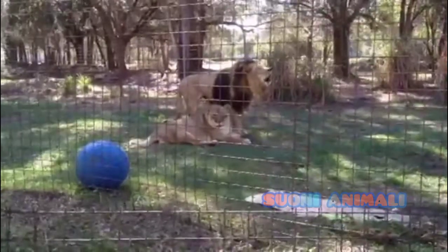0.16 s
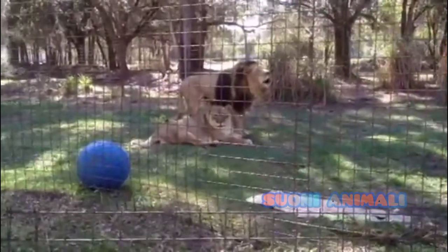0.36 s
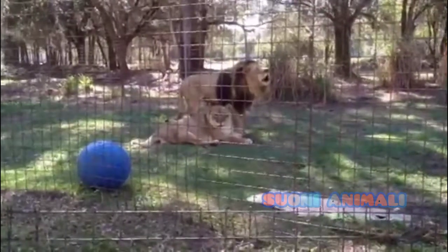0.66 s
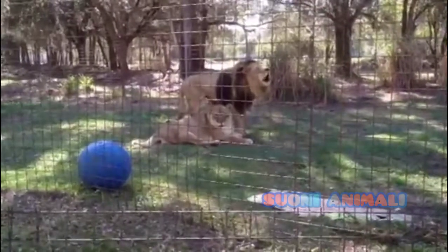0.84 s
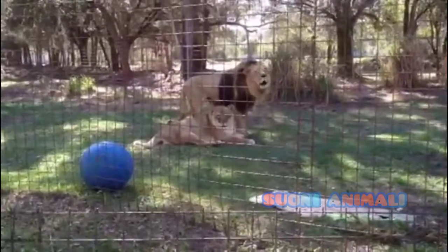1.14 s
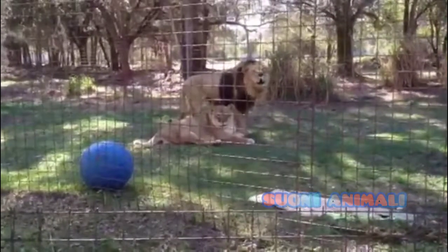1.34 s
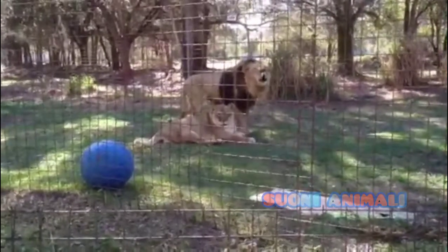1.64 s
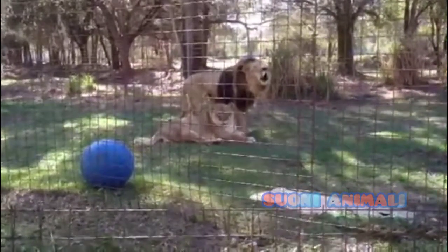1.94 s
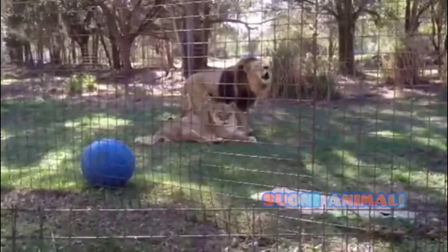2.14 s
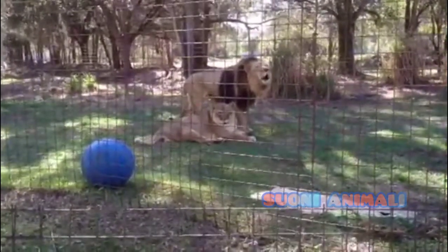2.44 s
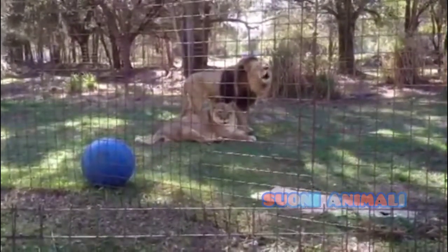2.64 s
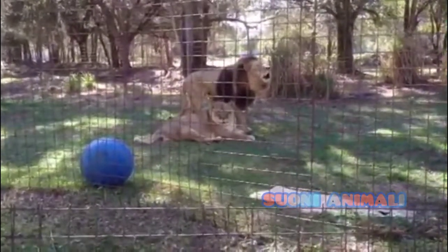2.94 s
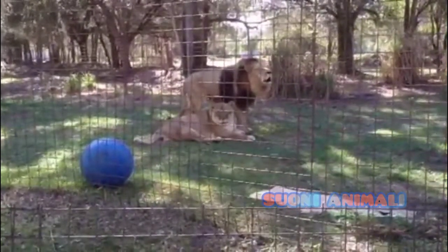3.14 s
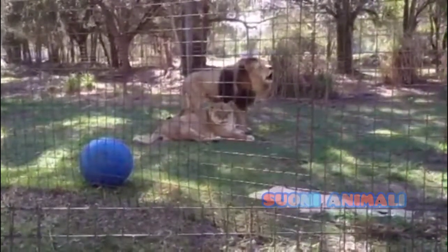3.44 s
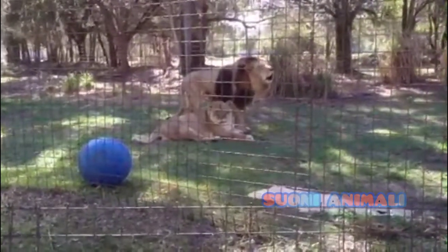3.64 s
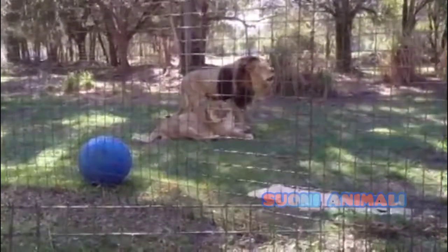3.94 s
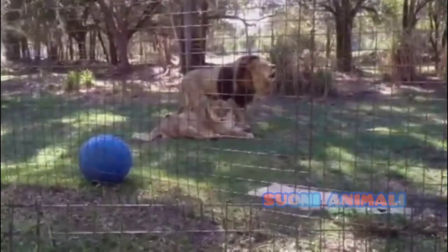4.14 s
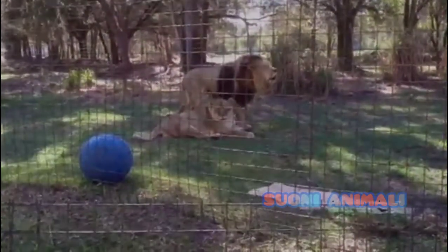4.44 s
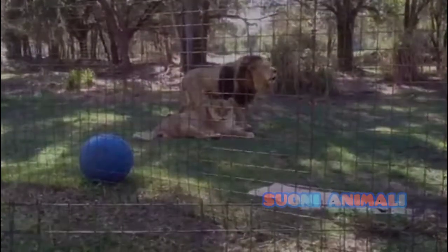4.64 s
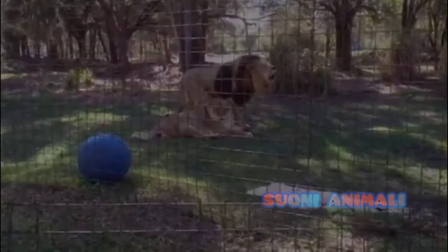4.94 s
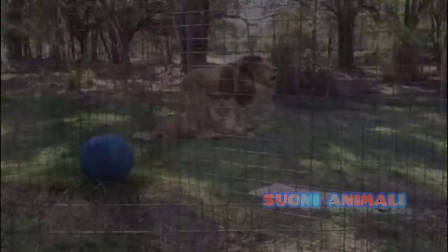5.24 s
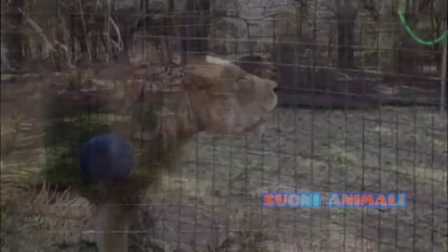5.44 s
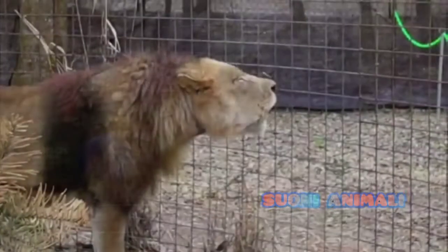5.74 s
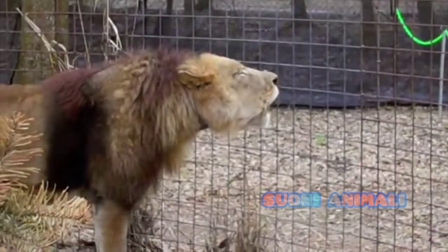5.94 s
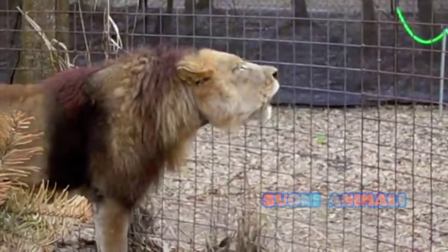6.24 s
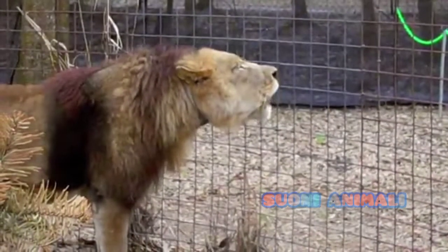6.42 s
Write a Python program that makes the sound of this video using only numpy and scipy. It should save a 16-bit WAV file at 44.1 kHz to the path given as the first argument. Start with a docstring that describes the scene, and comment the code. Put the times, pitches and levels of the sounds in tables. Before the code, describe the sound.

Mono outdoor sound: a male lion at moderate distance pumps out heavy, breathy grunting roars with rough growling tails, over quiet woodland air and faint stirrings. An abrupt cut leaves a short gap. Then wider, close-miked sound fades in: another lion's nasal moan grows into a loud raspy roar with hissing breath and wall reflections, still going at the end.

```python
"""A run of short roars comes first, each surging to a deep boom and sagging into a rattling growl: a lion
in a wooded enclosure. The sound cuts off, and a second lion, close by in a walled yard, swells from a moan
into one long, harsh roar. Each voice is a train of vocal-fold pulses and puffed noise filtered by throat
resonances, joined by sine overtones and hiss; decaying noise tails give the echoes of each place."""
import sys
import numpy as np
from scipy import signal
from scipy.fft import rfft, irfft, next_fast_len
from scipy.io import wavfile
from scipy.ndimage import uniform_filter1d, map_coordinates

SR = 44100
rng = np.random.default_rng(int(sys.argv[2]) if len(sys.argv) > 2 else 0)


def digitize_waveform(pressure):
    """Quantize a signal to 16-bit integers and store it at the path in sys.argv[1].

    Rows of a 2-D input are taken as channels; values are limited to [-1, 1].
    """
    field = np.atleast_2d(pressure).T
    bounded = np.clip(field, -1, 1)
    quanta = np.round(bounded * 32767).astype(np.int16)
    wavfile.write(sys.argv[1], SR, quanta)


N = 290173

# In filter tables only the shape matters: the filtered sound is brought to rms 1.
# Background spectrum of the wood and of the yard: (frequency [Hz], density [dB per Hz])
WOOD_SPECTRUM = [(24, -92), (40, -65.5), (105, -20), (122, -18), (145, -5.5), (191, -13.5), (338, -18),
                 (364, -16), (412, -22), (693, -14), (1000, -16.5), (1730, -31), (4560, -33.5),
                 (5290, -33.5), (15000, -47)]
YARD_SPECTRUM = [(24, -41), (40, -8), (565, -3.5), (1470, -8), (2120, -10), (4530, -25), (7050, -19.5),
                 (14000, -42)]
WOOD_DB = -49
# Echo among the trees and between the walls: (frequency [Hz], time to decay by 60 dB [s])
TREE_DECAY = [(150, 0.52), (800, 0.67), (3000, 0.2), (12000, 0.13)]
WALL_DECAY = [(150, 0.93), (1000, 0.36), (8000, 0.3)]
# Faint rustles between the roars: (time [s], Gaussian spread [s], level [dB])
RUSTLES = [(0.752, 0.033, -54), (1.54, 0.0096, -51), (1.602, .025, -52), (3.422, 0.0051, -49.5),
           (3.461, 0.026, -51), (3.947, 0.0031, -53)]
# Spectrum of the rustles: (frequency [Hz], level [dB])
RUSTLE_SPECTRUM = [(200, -16.5), (700, 4), (1150, 3.5), (1800, -5), (4000, -16.5), (9000, -17.5),
                   (15000, -39)]

# Short roars: (time of the boom [s], boom level [dB], relative rasp level [dB], top pitch [Hz],
# stretch of the rise [factor], growl length [s], relative growl chest level [dB],
# relative growl rasp level [dB], fade of that rasp [dB])
ROARS = [(0.11, -7.5, -20, 156.1, 1.005, .19, -25, -29, 10.5),
         (.917, -8, -19.5, 157, 0.98, 0.12, -24, -29, 9.5),
         (1.834, -8.5, -20.5, 153.7, 1.233, .5, -20.5, -29.5, 6.5),
         (2.904, -9, -21.5, 148, .95, 0.059, -26, -31.5, 5.5),
         (3.602, -8, -19.5, 152.4, 1, .09, -23, -30, 7.5),
         (4.305, -8, -20.5, 151, 1.01, 0.084, -24, -33.5, 5.5),
         (4.984, -9.5, -21.5, 151.5, 1.004, 0.095, -24.5, -30, 1.5)]
# Catches in the throat, where the growl rattles harder: (time [s], Gaussian spread [s], lift [dB])
CATCHES = [(0.298, 0.0057, 5), (1.095, .012, 3.5), (1.9, 0.012, 3.5), (2.02, 0.004, 4.5), (2.078, 0.011, 6),
           (2.157, 0.013, 7.5), (2.232, 0.0029, 3), (2.281, 0.015, 8.5), (2.387, 0.0064, 12),
           (2.988, 0.012, 6), (3.674, 0.0098, 5), (4.4, 0.0081, 1.5)]
# First lion's throat in the surge, slope: (frequency [Hz], level [dB])
SURGE_SLOPE = [(110, -54), (260, -1.5), (410, -0.5), (600, -4.5), (950, -11), (1600, -11.5), (2050, -18),
               (2600, -17.5), (4200, -40), (6000, -53)]
# and its resonances: (centre [Hz], width [Hz], lift [dB])
SURGE_FORMANTS = [(457, 66, 13.2), (660, 88, 4.8), (1088, 62, 8.4), (1735, 140, 7.8), (3700, 250, 16)]
# First lion's throat in the growl, slope: (frequency [Hz], level [dB])
GROWL_SLOPE = [(90, -64), (180, 11.5), (260, -9.5), (330, -3.5), (480, -7.5), (900, -8.5), (1600, -22.5),
               (2050, -21), (2700, -25), (4200, -37.5), (6000, -42)]
# and its resonances: (centre [Hz], width [Hz], lift [dB])
GROWL_FORMANTS = [(475, 89, 13), (736, 33.5, 19), (914, 32, -12), (1136, 130, 15), (1623, 220, 14.5),
                  (2420, 180, 13), (2855, 51, 16)]
# Clear overtones of the surge: (multiple of the pitch [integer], relative level [dB])
SURGE_ORDERS = [(3, -3.5), (5, -10.5), (8, -15.5)]
# First lion's air past the teeth: (frequency [Hz], level [dB])
TEETH_SPECTRUM = [(1500, -33), (3000, 0.5), (4500, 0.5), (5300, -10.5), (6200, -0.5), (8000, 2.5),
                  (10500, -12.5), (13500, -2), (15500, -11)]
# Low turbulent rumble of the first lion: (frequency [Hz], level [dB])
RUMBLE_SPECTRUM = [(20, -9.5), (90, 4.0), (200, -1.5), (500, -69.0)]

# Long roar: (time [s], pitch [Hz], roughness [0-1, clipped], mouth opening [0-1])
LONG_ROAR = [(5.4, 137.8, 0.49, 0.09), (5.58, 142.8, 0.67, 0), (5.68, 135.6, 0, 0.32),
             (5.77, 131.8, 0.14, 0.96), (5.89, 128.6, 0.57, 0.94), (6.0, 134.1, 0.99, 1),
             (6.55, 129.9, 1.03, 0.98)]
# Its effort: (time [s], relative throat level [dB], chest level [dB])
EFFORT = [(5.28, -61, -68), (5.33, -43.5, -48.5), (5.43, -27.5, -50.5), (5.72, -22.5, -38.5),
          (5.88, -18.5, -34.5), (6.03, -18, -23.5), (6.25, -19, -23.5), (6.55, -22.5, -24.5)]
# Its throat resonances rise, sink back and rise again: (time [s], frequency scale [factor])
LONG_SCALE = [(5.55, 1), (5.75, 1.03), (6.0, 1.005), (6.58, 1.02)]
# Clear overtones of the long roar: (multiple of the pitch [integer],
# relative level with mouth shut [dB], relative level with mouth open [dB])
LONG_ORDERS = [(2, -6.5, -10), (3, -8, -18.5), (4, -3, -17.5), (5, -21, -21), (6, -7.5, 0), (7, -21, -9.5),
               (8, -19.5, -15.5), (10, -21, -19.5), (11, -14, -17.5), (14, -33, -23), (18, -20.5, -15),
               (19, -26, -18)]
# Overtones of its second vibration: (multiple of that pitch [integer], relative level [dB])
SECOND_ORDERS = [(3, -10), (4, -0.5), (5, -18.5)]
# Second lion's throat with the mouth nearly shut, slope: (frequency [Hz], level [dB])
SHUT_SLOPE = [(110, -58), (260, -1.5), (420, 0), (900, -11), (1200, -28), (2000, -23), (2700, -25),
              (3400, -45), (6000, -61.5)]
# and its resonances: (centre [Hz], width [Hz], lift [dB])
SHUT_FORMANTS = [(530, 85, 13.8), (842, 74, 21), (1443, 150, 24), (1837, 72, 15), (2500, 550, 12.4)]
# Second lion's throat with the mouth wide open, slope: (frequency [Hz], level [dB])
OPEN_SLOPE = [(110, -48), (180, 1), (280, -22.5), (480, -0.5), (640, -12), (850, -2.5), (1200, -14.5),
              (1650, -12.5), (2100, -28), (3200, -22), (4500, -30), (6500, -54)]
# and its resonances: (centre [Hz], width [Hz], lift [dB])
OPEN_FORMANTS = [(415, 90, 8.3), (534.3, 18, 10.8), (718.3, 38.5, 22.4), (836, 65, 11.3),
                 (1011.6, 19, 15.4), (1525, 120, 8.5), (2170, 120, 3.8), (2927, 134, 13.8)]
# Second lion's hiss, slope: (frequency [Hz], level [dB])
FANG_SLOPE = [(2500, -5), (4500, -13), (5500, -6), (6400, -2.5), (7600, -3.5), (9000, -15), (11000, -26),
              (14000, -29.5), (15000, -50)]
# and its resonances: (centre [Hz], width [Hz], lift [dB])
FANG_WHISTLES = [(4640, 145, 12.5), (5330, 120, 6.5), (6300, 230, 9), (7080, 160, 7), (7700, 200, 2.5)]
# Moans and squeals that slide through the long roar: (time [s], length [s], first pitch [Hz],
# last pitch [Hz], level [dB])
GLIDES = [(5.311, 0.15, 182.5, 239, -43), (5.414, 0.078, 562, 549, -31), (5.516, 0.073, 235, 206, -23.5),
          (5.572, 0.144, 885, 802, -31.5), (5.702, 0.067, 1869, 1840, -35), (5.82, 0.2, 1047, 1027, -32.5),
          (5.932, 0.037, 2520, 2440, -37), (5.973, 0.59, 220, 193.2, -30.5)]

CUT_S = 5.0
TOP_HZ = 15500
SURGE_ROUGH, GROWL_ROUGH = 0.88, 0.85  # share of noise power among the pulses
# surge of each short roar: attacks and releases are the times taken by 20 dB
BOOM_HOLD_S, BOOM_ATTACK_S, BOOM_RELEASE_S = 0.01423, 0.06, 0.02656
RASP_LEAD_S, RASP_ATTACK_S, RASP_RELEASE_S = 0.034, 0.042, 0.048
# pitch leaps from rest to its top, drops back and sags through the growl
REST_HZ, GROWL_HZ, SLACK_HZ, LEAP_S, TOP_S, DROP_S = 134, 130, 114, .064, 0.00867, .03
# throat resonances climb through the surge, then settle: scales, and seconds before and after the boom
SCALE_START, SCALE_TOP, SCALE_GROWL, CLIMB_S, CREST_S = .8, 1.1, .99, .1, .023
# the growl follows the boom and weakens as the air runs out
GROWL_DELAY_S, GROWL_ATTACK_S, GROWL_RELEASE_S = .052, 0.033, .06
CHEST_FADE_DB, GROWL_HISS_DB, HISS_FADE_DB = 11, -43.5, 12
# a partial swoops up as the surge breaks into the growl
SWOOP_FROM_HZ, SWOOP_TO_HZ, SWOOP_MIDDLE_S, SWOOP_GLIDE_S = 190, 294.2, .046, 0.017
SWOOP_DB, SWOOP_HOLD_S, SWOOP_ATTACK_S, SWOOP_RELEASE_S = -25, 0.013, 0.11, 0.063
# the second lion's hiss (relative level) swells, is full at FANG_FULL_S and then slowly fades
FANG_DB, FANG_FULL_S, FANG_ATTACK_S, FANG_FADE_DB_PER_S = -33.5, 5.784, 0.44, 3.5
# a second, slower vibration of the folds sets in at full effort
SECOND_START_S, SECOND_ATTACK_S, SECOND_HZ, SECOND_SAG_HZ_PER_S, SECOND_DB = 6.0, 0.18, 112.8, 7, -26.5
BEAT_DB = 1.9  # the rasp throbs at the beat of the two vibrations
GLIDE_ATTACK_S, GLIDE_RELEASE_S, GLIDE_JITTER = 0.025, 0.05, .012


def amp(db):
    """Logarithmic level: decibels to amplitude gain."""
    return 10 ** (np.asarray(db) / 20)


def unit(x):
    """Power normalisation: x scaled to rms 1."""
    return x / np.sqrt(np.mean(x ** 2) + 1e-20)


def clock():
    """Uniform sampling: the time of each sample in seconds."""
    return np.arange(N) / SR


def along(points, hz):
    """Logarithmic frequency scale: interpolate (Hz, value) points along it."""
    f, v = np.transpose(points)
    return np.interp(np.log(hz + 1), np.log(f + 1), v)


def curves(rows, ease=0.005):
    """Gradual control: one curve for each column after the time, corners rounded over ease seconds."""
    s, *cols = np.transpose(rows)
    lines = np.array([np.interp(clock(), s, c) for c in cols])
    return uniform_filter1d(lines, max(1, int(ease * SR)), axis=1)


def gate(start, end, fade):
    """Linear fading: one between two times, with a ramp outside each."""
    inside = np.minimum(clock() - start, end - clock())
    return np.clip(inside / fade + 1, 0, 1)


def swell(start, hold, attack, release, curve=1.8):
    """Attack and decay: full for hold seconds; 20 dB down one attack before and one release after."""
    t = clock() - start
    away = np.maximum(-t / attack, 0) + np.maximum((t - hold) / release, 0)
    return amp(-20 * np.minimum(away, 10) ** curve)


def wobble(rate, size=16):
    """Band-limited random drift: a smooth curve with rate random knots a second."""
    steps = np.arange(0, N + size, size)
    knots = rng.standard_normal(int(N * rate / SR) + 4)
    return np.interp(np.arange(N), steps, map_coordinates(knots, [steps * rate / SR]))


def colour(x, slope, formants=(), size=8192):
    """Minimum-phase filtering: x through a slope with resonances on it, at rms 1."""
    hz = np.fft.rfftfreq(size, 1 / SR)
    db = along(slope, hz)
    for centre, width, lift in formants:
        db = db + lift / (1 + (2 * (hz - centre) / width) ** 2)
    # folding the cepstrum onto positive times makes the filter causal
    cepstrum = irfft(np.log(amp(db)))
    cepstrum[1:size // 2] *= 2
    cepstrum[size // 2 + 1:] = 0
    response = irfft(np.exp(rfft(cepstrum)))
    return unit(signal.oaconvolve(x, response)[:N])


def wood_air():
    """Broadband ambient noise: the soft, wavering background of the wood."""
    noise = colour(rng.standard_normal(N), WOOD_SPECTRUM, [(160, 82, 9.4)])
    return amp(WOOD_DB + 1.2 * wobble(9.5)) * noise


def yard_air():
    """Broadband ambient noise: the steady, very faint background of the yard."""
    return amp(-62.0) * colour(rng.standard_normal(N), YARD_SPECTRUM)


def rustles():
    """Noise under Gaussian envelopes: soft brief stirrings."""
    gain = sum(amp(db) * np.exp(-.5 * ((clock() - s) / spread) ** 2) for s, spread, db in RUSTLES)
    return gain * colour(rng.standard_normal(N), RUSTLE_SPECTRUM)


def echo(x, t60, size=256):
    """Diffuse reverberation: a noise tail in which each frequency dies at its own speed."""
    hz, t, z = signal.stft(rng.standard_normal(SR), SR, nperseg=size)
    decay = amp(-60 * t / along(t60, hz)[:, None])
    tail = signal.istft(z * decay, SR, nperseg=size)[1]
    tail = np.pad(tail / np.linalg.norm(tail), (SR // 100, 0))  # sets in after 10 ms
    return signal.oaconvolve(x, tail)[:N]


def cycles(pitch, jitter):
    """Phase as the integral of frequency: cycles counted at a trembling pitch."""
    return np.cumsum(pitch * (1 + jitter * wobble(90))) / SR


def puffs(turns, depth):
    """Modulated turbulence: noise of air let through most strongly once a cycle."""
    return unit(rng.standard_normal(N) * np.exp(depth * np.cos(2 * np.pi * turns)))


def folds(turns, rough, scatter_db):
    """Vocal-fold excitation: one uneven pulse a cycle, mixed with a share of puffed noise."""
    since = (turns % 1 - .5) / np.gradient(turns)  # samples from the pulse
    pulses = unit(np.sinc(since / 2) * np.exp(-(since / 10) ** 2))
    rough = np.clip(rough, 0, 1)
    mix = np.sqrt(1 - rough) * pulses + np.sqrt(rough) * puffs(turns - .5, depth=0.25)
    return unit(mix * amp(scatter_db * wobble(110)))


def bend(x, scale):
    """Time warping: all resonances of x multiplied by a scale that changes in time."""
    return map_coordinates(x, [np.cumsum(scale)], mode="mirror")


def throat(turns, scale, slope, formants, rough, scatter_db):
    """Source and filter: pulses through resonances that all move by one scale at unchanged pitch."""
    # divide the pitch by the scale beforehand, so that the warp restores it
    rate = np.interp(np.arange(N), np.cumsum(scale), np.gradient(turns) / scale)
    pulses = folds(np.cumsum(rate), rough, scatter_db)
    return bend(colour(pulses, slope, formants), scale)


def ragged(x, depth_db, size=512):
    """Random spectral modulation: the colour of a rasp flickers from moment to moment."""
    z = signal.stft(x, nperseg=size)[2]
    field = uniform_filter1d(rng.standard_normal(z.shape), size=3, axis=0)  # over frequency
    field = uniform_filter1d(field, size=9, axis=1)  # over time
    flicker = amp(depth_db * np.tanh(unit(field)))
    return unit(signal.istft(z * flicker, nperseg=size)[1][:N])


def overtones(turns, orders, waver_db):
    """Harmonic series: clear multiples of the pitch, each wavering in strength."""
    out = np.zeros(N)
    for k, db in orders:
        partial = np.sin(2 * np.pi * (round(k) * turns + rng.random()))
        out += amp(db + waver_db * wobble(25)) * partial
    return np.sqrt(2) * out


def roar_shape():
    """Fold tension and throat tuning: pitch and resonances climb in each surge, then fall for the growl."""
    pitch, scale = [], []
    for s, _, _, top_hz, stretch, length, *_ in ROARS:
        top, growl = s + TOP_S, s + GROWL_DELAY_S
        pitch += [(top - stretch * LEAP_S, REST_HZ), (top, top_hz), (top + DROP_S, REST_HZ),
                  (growl + length / 2, GROWL_HZ), (growl + length + GROWL_RELEASE_S / 2, SLACK_HZ)]
        scale += [(s - stretch * CLIMB_S, SCALE_START), (s + CREST_S, SCALE_TOP),
                  (growl, SCALE_GROWL), (growl + length, SCALE_GROWL)]
    return curves(pitch, ease=.012)[0], curves(scale)[0]


def surges():
    """Staggered envelopes: the rasp is full first, and the boom is full as the rasp begins to fall."""
    boom, rasp = np.zeros((2, N))
    for s, boom_db, rasp_db, _, stretch, *_ in ROARS:
        lead = stretch * RASP_LEAD_S
        boom += amp(boom_db) * swell(s, BOOM_HOLD_S, stretch * BOOM_ATTACK_S, BOOM_RELEASE_S, curve=1.4)
        rasp += amp(rasp_db) * swell(s - lead, lead, stretch * RASP_ATTACK_S, RASP_RELEASE_S, curve=1.54)
    return boom, rasp


def growls():
    """Decay with spent breath: gains of chest tone, rattle and hiss, the chest tone dropping latest."""
    chest, rattle, hiss = np.zeros((3, N))
    for s, *_, length, chest_db, rasp_db, fade_db in ROARS:
        start = s + GROWL_DELAY_S
        spent = np.clip((clock() - start) / length, 0, 1)
        flow = swell(start, length, GROWL_ATTACK_S, GROWL_RELEASE_S, curve=1.2)
        chest += flow * amp(chest_db - CHEST_FADE_DB * spent ** 3)
        rattle += flow * amp(rasp_db - fade_db * spent)
        hiss += flow * amp(GROWL_HISS_DB - HISS_FADE_DB * spent)
    catch_db = sum(db * np.exp(-.5 * ((clock() - s) / spread) ** 2) for s, spread, db in CATCHES)
    shake_db = catch_db + 0.92 * wobble(45)
    return chest, rattle * amp(shake_db), hiss * amp(0.59 * shake_db)


def swoops():
    """Frequency glide: one unsteady partial slides upward just after every boom."""
    middles = np.array([roar[0] for roar in ROARS]) + SWOOP_MIDDLE_S
    nearest = np.searchsorted((middles[1:] + middles[:-1]) / 2, clock())
    since = clock() - middles[nearest]
    rise = (1 + np.tanh(since / SWOOP_GLIDE_S / 2)) / 2
    hz = SWOOP_FROM_HZ + (SWOOP_TO_HZ - SWOOP_FROM_HZ) * rise
    gain = sum(swell(s, SWOOP_HOLD_S, SWOOP_ATTACK_S, SWOOP_RELEASE_S) for s in middles)
    return amp(SWOOP_DB) * gain * np.sin(2 * np.pi * cycles(hz, jitter=.04))


def first_lion():
    """Tone and turbulence: chest tone under rasping pulses and hiss; slack growling folds beat unevenly."""
    pitch, scale = roar_shape()
    boom, rasp = surges()
    scale = scale * (1 + .014 * wobble(16))
    chest, growl, hiss = growls()
    slack = chest / (chest + boom + 1e-6)
    turns = cycles(pitch, jitter=0.00802 + 0.028 * slack)

    tone_gain = boom + amp(-1.5) * chest * amp(3.0 * wobble(60))
    tone = np.sqrt(2) * np.sin(2 * np.pi * turns) * tone_gain
    octave = amp(-11.5) * chest * overtones(turns, [(2, 0)], waver_db=3)

    pulses = throat(turns, scale, SURGE_SLOPE, SURGE_FORMANTS, rough=SURGE_ROUGH, scatter_db=2.0)
    bark = amp(-3.0) * ragged(pulses, depth_db=4.5)
    bark += amp(-5) * overtones(turns, SURGE_ORDERS, waver_db=6.0)

    pulses = throat(turns, scale, GROWL_SLOPE, GROWL_FORMANTS, rough=GROWL_ROUGH, scatter_db=2.5)
    rattle = amp(2.0) * growl * ragged(pulses, depth_db=5.5)

    teeth = ragged(colour(puffs(turns, depth=0.093), TEETH_SPECTRUM), depth_db=7)
    air = (amp(-21.0) * rasp + hiss) * teeth
    rumble_gain = amp(-29) * rasp + amp(-37) * growl
    rumble = rumble_gain * colour(rng.standard_normal(N), RUMBLE_SPECTRUM)
    return tone + rasp * bark + rattle + octave + swoops() + air + rumble


def glides():
    """Frequency glides: unsteady single tones, each sliding from one pitch to another."""
    out = np.zeros(N)
    for s, length, first_hz, last_hz, db in GLIDES:
        hz = np.interp(clock(), [s, s + length], [first_hz, last_hz])
        turns = cycles(hz, jitter=GLIDE_JITTER)
        gain = amp(db) * swell(s, length, GLIDE_ATTACK_S, GLIDE_RELEASE_S)
        out += gain * overtones(turns, [(1, 0)], waver_db=1.5)
    return out


def second_vibration():
    """Two-frequency vibration: gain and cycle count of a slower motion beating against the main voice."""
    hz = SECOND_HZ - SECOND_SAG_HZ_PER_S * (clock() - SECOND_START_S)
    return swell(SECOND_START_S, N / SR, SECOND_ATTACK_S, 1), cycles(hz, jitter=0.016)


def second_lion():
    """Source and changing filter: the mouth opens as a moan turns harsh; rasp, overtones, chest and hiss."""
    pitch, rough, mouth = curves(LONG_ROAR)
    rough, mouth = np.clip([rough, mouth], 0, 1)
    effort, chest = amp(curves(EFFORT, ease=0.027)) * gate(EFFORT[0][0], N / SR, fade=0.072)
    turns = cycles(pitch, jitter=0.00507 + 0.00701 * rough)
    scale = curves(LONG_SCALE)[0]

    shut = colour(folds(turns, rough=1.0, scatter_db=6.5), SHUT_SLOPE, SHUT_FORMANTS)
    wide = throat(turns, scale, OPEN_SLOPE, OPEN_FORMANTS, rough=0.84, scatter_db=1.5)
    rasp = ragged(np.sqrt(1 - mouth) * shut + np.sqrt(mouth) * wide, depth_db=3.0)
    harsh = amp(-0.5) * effort * np.sqrt(rough) * rasp

    orders = [(k, shut_db + mouth * (open_db - shut_db)) for k, shut_db, open_db in LONG_ORDERS]
    clear = amp(-2.5) * effort * np.sqrt(1 - rough) * overtones(turns, orders, waver_db=4.5)
    tone = chest * overtones(turns, [(1, 0)], waver_db=1.5)

    second, second_turns = second_vibration()
    clear += amp(SECOND_DB) * second * overtones(second_turns, SECOND_ORDERS, waver_db=3.0)
    clear += glides()
    harsh *= amp(BEAT_DB * second * np.cos(2 * np.pi * (turns - second_turns)))

    fade_db = FANG_FADE_DB_PER_S * np.maximum(clock() - FANG_FULL_S, 0)
    hiss_gain = amp(FANG_DB - fade_db) * swell(FANG_FULL_S, N / SR, FANG_ATTACK_S, 1)
    hiss = bend(colour(puffs(turns, depth=0.12), FANG_SLOPE, FANG_WHISTLES), scale)
    return harsh, clear, tone, hiss_gain * ragged(hiss, depth_db=6)


def wood():
    """Direct and scattered sound: the first lion among trees, in mono, over a soft background."""
    lion = first_lion()
    return lion + amp(-25.5) * echo(lion, TREE_DECAY) + wood_air() + rustles()


def yard():
    """Reverberation between walls in stereo: the second lion, its hiss spread wide and leaning left."""
    harsh, clear, chest, hiss = second_lion()
    voice = harsh + clear
    ring = amp(-17.0) * echo(clear, WALL_DECAY) + amp(-5.0) * echo(harsh, WALL_DECAY)
    middle = voice + chest + ring + yard_air()
    # the gradient weakens low frequencies, so the bass stays in the middle
    side = amp(-8.5) * echo(np.gradient(voice), WALL_DECAY) + amp(-4.5) * echo(hiss, WALL_DECAY)
    return middle + hiss * amp([[3], [-5]]) + np.array([side, -side])


def scene():
    """Succession of two sound fields: the wood stops dead, then the yard fades in."""
    return wood() * gate(0, CUT_S, fade=0.0011) + yard() * gate(5.2, N / SR, fade=0.11)


def record(dry):
    """Band limitation: nothing is kept at or above the top frequency."""
    size = next_fast_len(N + SR // 2)
    kept = np.fft.rfftfreq(size, 1 / SR) < TOP_HZ
    return irfft(rfft(dry, size) * kept, size)[:, :N]


dry = scene()
out = record(dry)
digitize_waveform(out)
```